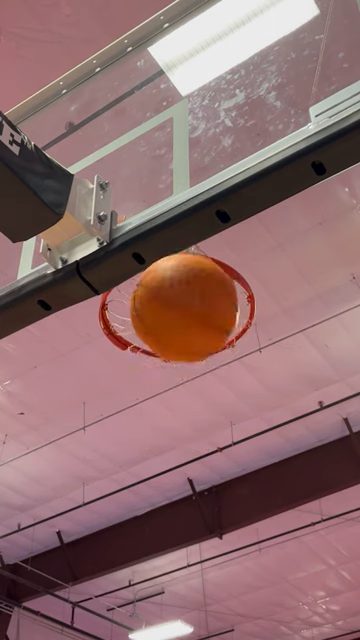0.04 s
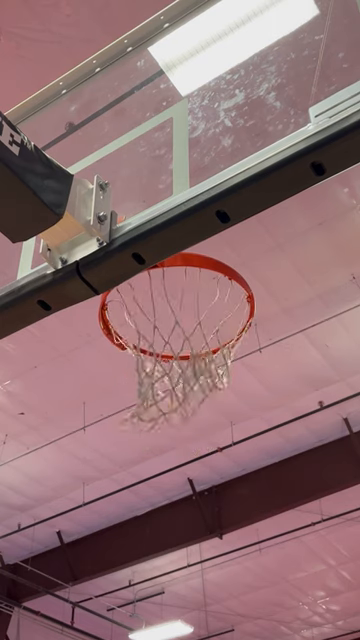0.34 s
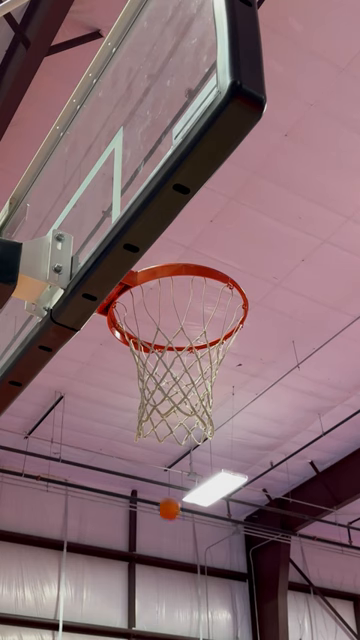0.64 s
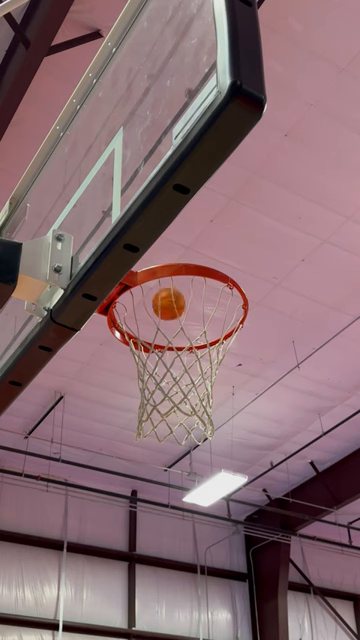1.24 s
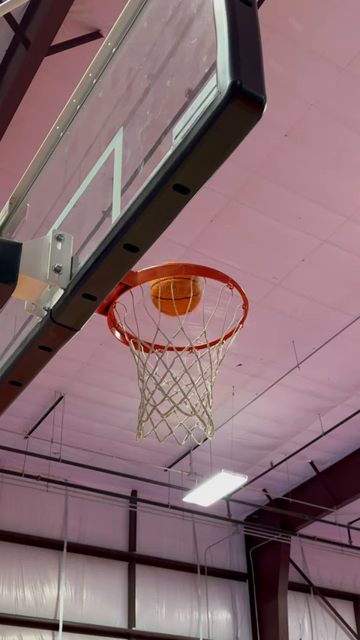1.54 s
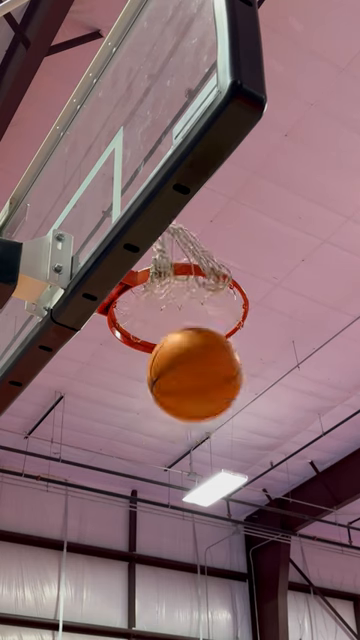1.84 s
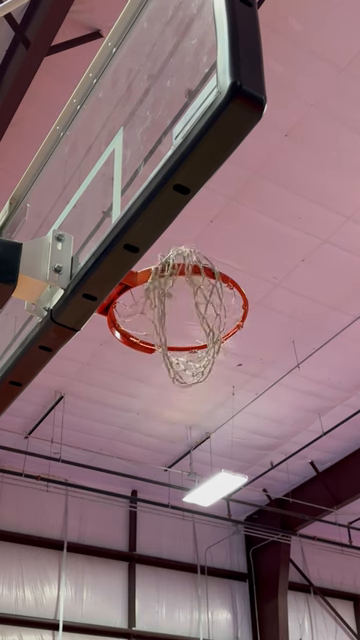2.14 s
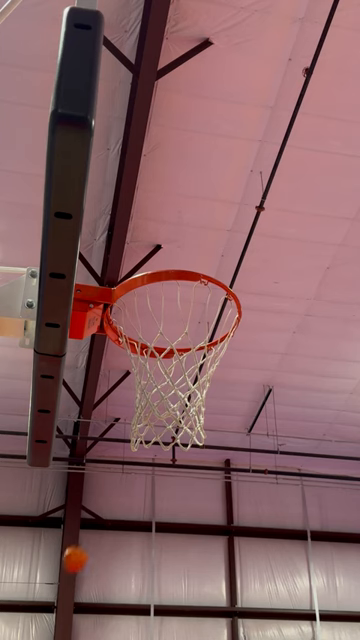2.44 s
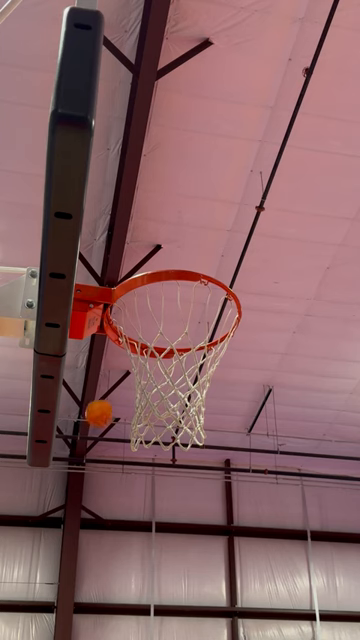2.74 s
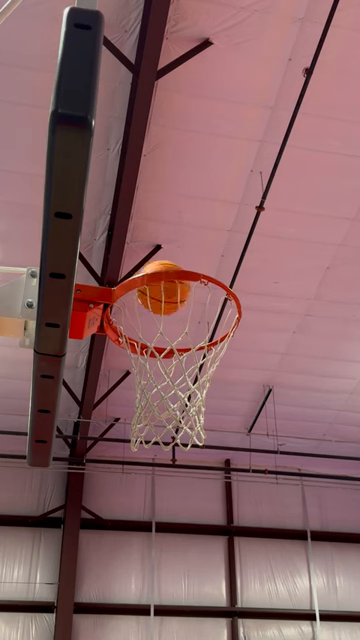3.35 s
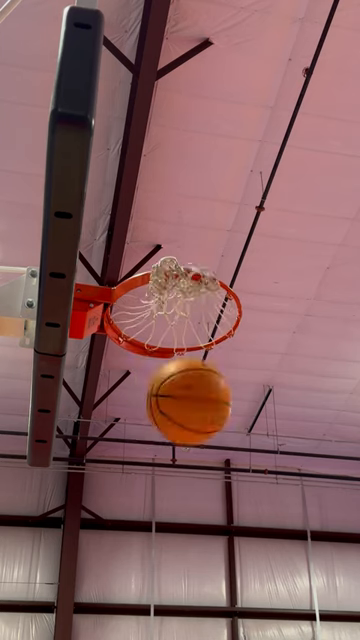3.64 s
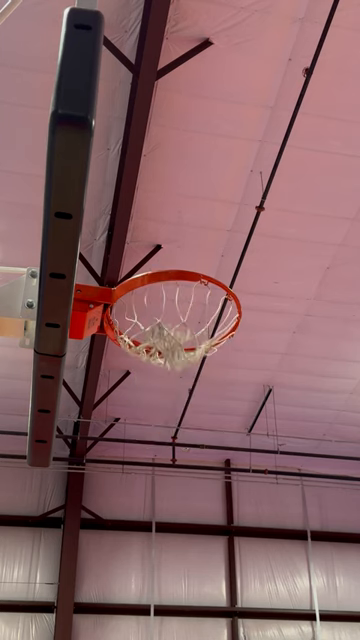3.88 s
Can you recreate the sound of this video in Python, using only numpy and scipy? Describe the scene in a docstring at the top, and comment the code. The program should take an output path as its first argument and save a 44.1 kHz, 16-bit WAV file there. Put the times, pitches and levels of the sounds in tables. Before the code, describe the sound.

Two sharp basketball net swishes close overhead, each after a dull thud on the gym floor.

```python
"""Swishes from under the hoop

Three basketball shots drop cleanly through a nylon net in a large gym, close above a stereo microphone.
The ball slaps the cords, rubs through them, and the net whips back; the first swish is already dying
away at the start. Duller thuds farther off (probably the shooter landing) come before the next two.
Shoes squeak faintly across the hall. Ventilation rumbles throughout, its level shifting with each shot."""
import sys
import numpy as np
from scipy import signal
from scipy.fft import rfft, irfft, next_fast_len
from scipy.io import wavfile
from scipy.ndimage import uniform_filter1d, map_coordinates

SR = 44100
rng = np.random.default_rng(int(sys.argv[2]) if len(sys.argv) > 2 else 0)


def store_wav(level_fs):
    """Save 16-bit WAV to argv[1]."""
    pcm = np.round(np.clip(np.atleast_2d(level_fs), -1, 1) * 32767)
    wavfile.write(sys.argv[1], SR, pcm.T.astype(np.int16))


N = 176400
LEAD_S = .3  # the first swish begins in this unheard lead-in
LEAD = round(LEAD_S * SR)
TOTAL = N + LEAD
TIME = np.arange(TOTAL) / SR - LEAD_S
SHOT_CHANGES = [.44, 2.256]  # seconds at which one shot cuts to the next

# Cords hitting the ball. Each row: start in seconds, thump, slap, crack and fizz in dB, decay in seconds.
CORD_SNAPS = [(-.15, -30, -17.5, -25.5, -25.5, 0.0026), (-.1, -19.5, -22.5, -21, -30, 0.0055),
              (1.7041, -31, -30, -33, -41.5, 0.0016), (1.7058, -25.5, -24.5, -37.5, -47.5, 0.0027),
              (1.7122, -29, -32, -35.5, -38, .0009), (1.7248, -41, -35, -41, -47, .002),
              (1.7285, -39, -27.5, -33.5, -40, .0018), (1.7312, -40, -32, -29.5, -27, 0.00086),
              (1.7376, -42, -36, -33.5, -43, 0.00052), (1.7478, -34.5, -33, -38.5, -48, .0012),
              (1.7783, -55.5, -56, -54, -55, .001), (1.7836, -55, -51.5, -57, -43.5, .0005),
              (1.794, -51, -48, -38.5, -55, 0.0055), (3.4926, -42.5, -29.5, -32, -36.5, 0.0013),
              (3.4967, -41.5, -28, -38, -42, 0.0011), (3.5015, -40.5, -28.5, -35.5, -47, .002),
              (3.5245, -31, -26.5, -34, -45, 0.006), (3.5315, -36.5, -24.5, -32.5, -39, 0.0011),
              (3.5330, -37, -16, -41, -49, 0.0002), (3.538, -40, -41.5, -36.5, -55, 0.00069),
              (3.553, -61, -37.5, -44, -43.5, 0.00092), (3.5562, -42.5, -38.5, -36.5, -42.5, 0.0015),
              (3.5632, -46, -47, -49, -48, 0.0015), (3.5712, -48, -44.5, -54, -53, 0.00037),
              (3.5795, -58, -50.5, -56, -54, 0.00032), (3.5964, -58, -32, -37, -54, .003),
              (3.6040, -48, -40, -39.5, -49, 0.00066), (3.616, -48, -38.5, -49, -55, 0.0049)]
# Resonances of ball and taut net. Each row: centre in Hz, width in Hz, gain in dB.
THUMP_MODES = [(545, 94, 4), (630, 110, -2.5), (920, 200, -6.5)]
SLAP_MODES = [(1093, 130, -8), (1280, 210, 5.5), (1604, 250, -5.5)]
SHOVE_MODES = [(180, 70, -1.5), (300, 38, 1)]
# Tone of the nylon, close up. Each row: frequency in Hz, gain in dB.
CRACK_TONE = [(300, -11.5), (1200, -1), (2000, 3), (2900, -7), (3800, 5), (4500, 0), (5100, 2.5),
              (6000, -12), (9000, -21.5), (16000, -40)]
FIZZ_TONE = [(2000, -27.5), (5000, -6), (6300, 1), (8300, -2), (9500, -4), (12800, -7), (16000, -18.5)]
RUB_TONE = [(100, -20.5), (350, -7.5), (500, 1.5), (850, 0), (1350, 0), (2000, -6), (2900, -7.5),
            (4200, -8.5), (5500, -8.5), (7500, -15.5), (13000, -25), (16000, -38)]
# The ball ringing on. Each row: pitch in Hz, level in dB, seconds to fall 60 dB.
BALL_MODES = [(502, 5, 0.18), (1230, 6, 0.64), (1356, -2.5, 0.55), (1510, 1, .8), (2130, -5, 0.7),
              (3710, -0.5, 0.65), (5080, -4, 0.55)]
# The ball bearing on the net. Each row: start in seconds, first and last pitch in Hz, level in dB,
# rise in seconds.
HOLLOW_NOTES = [(1.7045, 1200, 490, -21, .0065), (1.7255, 1163, 560, -29.5, 0.0045),
                (1.7425, 802, 474, -28.5, .0095), (3.494, 1285, 658, -35, 0.011),
                (3.519, 752, 650, -28.5, 0.0074), (3.534, 680, 473, -28.5, 0.0069),
                (3.555, 797, 564, -38, .006), (3.572, 545, 474, -38, 0.0078)]
# The net taking the weight. Each row: start in seconds, level in dB, decay in seconds.
NET_SHOVES = [(1.711, -34.5, 0.0037), (1.721, -37, .008), (3.4979, -33, 0.0025), (3.513, -46, 0.0059)]
RUB_STARTS_S = [1.705, 3.494]  # seconds at which the ball starts through the mesh
# The rub after each start. Each row: hold in seconds, level in dB, settling time in seconds.
MESH_RUBS = [(0.043, -36.5, .012), (0.044, -38.5, 0.086)]
CATCH_PER_S = 220  # how fast the mesh catches and lets go

# Blows on the floor. Each row: start in seconds, body in dB, scuff in dB, decay in seconds.
FLOOR_THUDS = [(0.6128, -32.5, -41.5, 0.003), (0.6241, -33, -39, 0.0022), (0.63, -36.5, -49, 0.0017),
               (.639, -30, -57, 0.0092), (.651, -34, -50.5, 0.016), (.697, -41.5, -57.5, 0.016),
               (2.5041, -36.5, -41, 0.0066), (2.514, -31.5, -46, 0.012), (2.534, -29, -41.5, 0.007),
               (2.544, -35, -53, 0.015)]
# The hardest landings. Each row: time in seconds, level in dB.
BOARD_PUSHES = [(0.6311, -24.5), (2.509, -25.5), (2.518, -26)]
# Tone of the floor. Each row: frequency in Hz, gain in dB.
BOARD_TONE = [(60, -13.5), (150, -2), (330, 4), (520, 1.5), (750, 3), (1300, -3), (2000, -11),
              (3000, -27.5), (6000, -48), (16000, -65)]
SCUFF_TONE = [(500, -15.5), (2200, 5), (3200, -1.5), (5000, -3.5), (7500, -2.5), (9200, -6.5),
              (12500, -13.5), (16000, -22)]
# Faint ticks, and a small click at the cut to the last shot.
# Each row: start in seconds, level in dB, decay in seconds.
FAINT_TICKS = [(1.056, -70.5, 0.024), (1.2498, -66.5, 0.00087), (1.256, -70.5, 0.0032), (1.502, -78, .0012),
               (1.522, -79.5, 0.0027), (2.257, -68.5, 0.008), (3.7367, -55.5, 0.0017)]
# A brushing hiss swelling as the first shot ends. Each row: time in seconds, level in dB.
BRUSH_SWELL = [(.2, -77), (.33, -73), (.395, -72), (.42, -51.5), (.438, -56.5), (.442, -110)]
# Tone of ticks and brushing. Each row: frequency in Hz, gain in dB.
TICK_TONE = [(1000, -14), (4000, 3), (7300, 5.5), (9500, 0.5), (12500, -12), (16000, -21)]
BRUSH_TONE = [(300, -6), (1500, -3), (2900, 0.5), (4500, 0.5), (7500, -5), (12800, -13.5), (16000, -17.5)]
# Shoes across the hall. Each row: start and length in seconds, pitch in Hz, level in dB.
FAR_SQUEAKS = [(0.526, 0.34, 4600, -73), (2.37, 0.35, 4640, -84), (3.718, 0.11, 4940, -56.5)]
# Ventilation, shot by shot. Each row: rumble, low hum, high hum and air in dB.
VENT_LEVELS = [(-44, -56.5, -48, -56), (-44.5, -50, -55, -57), (-39, -41, -46, -59)]
# Tone of the ventilation. Each row: frequency in Hz, gain in dB.
RUMBLE_TONE = [(20, -12), (35, -11.5), (48, 2.5), (68, 1.5), (82, -0.5), (98, -2.5), (140, -8.5),
               (200, -19), (300, -28.5), (600, -60.5), (3000, -118)]
AIR_TONE = [(100, -7.5), (250, 2.5), (400, -6.5), (800, -5.5), (1300, -16.5), (2000, -21.5), (3000, -34),
            (5000, -40), (6500, -44), (9500, -45), (12000, -57), (16000, -63.5)]

# Decay of the hall. Each row: frequency in Hz, seconds to fall 60 dB.
HALL_T60 = [(100, 1.1), (500, 1.1), (1300, 1.465), (4000, 1.057), (7500, 0.57), (13000, 0.46),
            (16000, 0.28)]
# Tone of the hall's tail. Each row: frequency in Hz, gain in dB.
HALL_TONE = [(100, -22.5), (500, -18), (1300, -17.5), (2500, -14.5), (4500, -11.5), (7500, -12.5),
             (13000, -18.5)]
# Diffuse sound at the microphone's two ports. Each row: frequency in Hz, left-right correlation.
PORT_LIKENESS = [(80, 1), (130, .998), (290, .9), (640, .45), (1400, .5), (3000, -.05), (15000, -.1)]
# Direct sound from net and floor. Each row: frequency in Hz, left over right in dB.
NET_BALANCE = [(100, 1), (300, 1), (600, 2.4), (1200, 0.5), (2400, -2.5), (4000, -0.5), (14000, 1.5)]
THUD_BALANCE = [(100, -2), (700, 3.5), (1300, 2.5), (2600, -5), (3900, -1.5), (5000, -5), (6000, 1.5),
                (14000, 1)]
# The same two paths. Each row: frequency in Hz, radians by which left leads.
NET_PHASE = [(0, 0), (500, -.58), (1400, -.25), (2500, 2.1), (3100, 2.1), (3900, 1.3), (4800, 1.4),
             (5600, 3.2), (7400, 6), (8000, 6.6), (12200, 12.2), (16000, 17.2)]
THUD_PHASE = [(0, 0), (1400, 0), (2500, 1.8), (3800, 1), (4400, 2.5), (5200, 2), (5600, 3.2), (7400, 6.1),
              (8000, 6.6), (12200, 12.2), (16000, 17.2)]
# Two narrow dips and a slight lift in the treble. Each row: centre in Hz, width in Hz, gain in dB.
TREBLE_NOTCHES = [(5564, 230, -6.5), (10070, 390, -10.5), (14920, 420, 1)]


def cord_snaps(ring_db=-34.5, waver_per_s=70, waver_rad=1.2):
    """Just overhead, each cord thumps, slaps, cracks and fizzes on the ball and leaves it ringing."""
    out, t = np.zeros(TOTAL), np.arange(SR // 2) / SR
    wavers = [waver_rad * wobble(waver_per_s, len(t)) for _ in BALL_MODES]
    tones = [resonances(THUMP_MODES), resonances(SLAP_MODES), colour(CRACK_TONE), colour(FIZZ_TONE)]
    for start, thump_db, slap_db, crack_db, fizz_db, decay_s in CORD_SNAPS:
        gains = amp([thump_db, slap_db, crack_db, fizz_db])
        add(out, start, sum(gain * burst(decay_s, tone) for gain, tone in zip(gains, tones)))
        for (hz, db, t60), waver in zip(BALL_MODES, wavers):
            ring = amp(db - 60 * t / t60) * np.sin(2 * np.pi * (hz * t + rng.random()) + waver)
            add(out, start, amp(slap_db + ring_db) * ring)
    return out


def ball_weight(sink_s=.006, roughness=.17):
    """The ball loads the net: low shoves, and hollow notes that sink in pitch as the cords give."""
    out, t = np.zeros(TOTAL), np.arange(SR // 8) / SR
    for start, first_hz, last_hz, db, rise_s in HOLLOW_NOTES:
        hz = last_hz + (first_hz - last_hz) * np.exp(-t / sink_s)
        swell = (t / rise_s * np.exp(1 - t / rise_s)) ** 2
        catching = 1 + roughness * wobble(CATCH_PER_S, len(t))
        note = np.sin(2 * np.pi * (np.cumsum(hz) / SR + rng.random()))
        add(out, start, amp(db) * swell * catching * note)
    for start, db, decay_s in NET_SHOVES:
        add(out, start, amp(db) * burst(decay_s, resonances(SHOVE_MODES)))
    return out


def mesh_rub(slips_per_s=2200, catch_db=-1.5):
    """Dense slips of nylon on the pebbled ball, dying away as the net settles."""
    level = np.zeros(TOTAL)
    for start, (hold_s, db, settle_s) in zip(RUB_STARTS_S, MESH_RUBS):
        since_hold = np.maximum(TIME - start - hold_s, 0)
        level += amp(db) * (TIME > start) * np.exp(-since_hold / settle_s)
    slips = rng.standard_normal(TOTAL) * (rng.random(TOTAL) < slips_per_s / SR)
    catching = amp(catch_db * wobble(CATCH_PER_S, TOTAL))
    return level * unit(filtered(slips * catching, colour(RUB_TONE)))


def floor_thuds(push_s=.00045):
    """Farther off, dull blows with a bright scuff on the wooden floor; the hardest push the boards."""
    out = np.zeros(TOTAL)
    for start, body_db, scuff_db, decay_s in FLOOR_THUDS:
        add(out, start, amp(body_db) * burst(decay_s, colour(BOARD_TONE)))
        add(out, start, amp(scuff_db) * burst(decay_s, colour(SCUFF_TONE)))
    for centre, db in BOARD_PUSHES:
        offset = (TIME - centre) / push_s
        out -= amp(db) * offset * np.exp((1 - offset ** 2) / 2)  # one swing up and down
    return out


def brush_and_ticks():
    """One brushing swell, faint ticks, and a small click at the cut to the last shot."""
    swell = amp(np.interp(TIME, *np.transpose(BRUSH_SWELL), left=-120))
    out = swell * unit(filtered(rng.standard_normal(TOTAL), colour(BRUSH_TONE)))
    for start, db, decay_s in FAINT_TICKS:
        add(out, start, amp(db) * burst(decay_s, colour(TICK_TONE)))
    return out


def shoe_squeaks(width_hz=300, flutter_per_s=50, flutter_db=6.5):
    """Distant shoe squeaks, blurred by the hall into fluttering bands of noise."""
    out = np.zeros((2, TOTAL))
    flutter = amp(flutter_db * wobble(flutter_per_s, TOTAL))
    for start, length_s, hz, db in FAR_SQUEAKS:
        swell = np.exp(-(2 * (TIME - start) / length_s - 1) ** 2)
        out += amp(db) * swell * wash(lambda f: np.exp(-((f - hz) / width_hz) ** 2))
    return flutter * out


def ventilation(hums_hz=(73.17, 123.76), width_hz=2.7, crossfade_s=.02):
    """Room tone from all around: rumble, two wavering hums and moving air, at each shot's levels."""
    steps = amp(VENT_LEVELS)[np.searchsorted(SHOT_CHANGES, TIME)].T
    gains = uniform_filter1d(steps, round(crossfade_s * SR), axis=1)
    hums = [wash(lambda f: 1 / (1 + ((f - hz) / width_hz) ** 2)) for hz in hums_hz]
    layers = [wash(colour(RUMBLE_TONE)), *hums, wash(colour(AIR_TONE))]
    return sum(gain * layer for gain, layer in zip(gains, layers))


def gym_reverb(x, early_db=-18, early_t60_s=.22, build_s=.0019):
    """The gym answers with early reflections and a long tail, which ends with its shot."""
    out, shot = np.zeros((2, TOTAL)), np.searchsorted(SHOT_CHANGES, TIME)
    for k in range(len(SHOT_CHANGES) + 1):
        hz, frame_s, spectrum = signal.stft(rng.standard_normal((2, 2 * SR)), SR, nperseg=256)
        decay = amp(-60 * frame_s / along(HALL_T60, hz)[:, None])
        tail = signal.istft(spectrum * decay, SR, nperseg=256)[1]
        t = np.arange(tail.shape[1]) / SR
        build = 1 - np.exp(-t / build_s)
        tail *= build
        early = rng.standard_normal(tail.shape) * amp(-60 * t / early_t60_s) * build
        answer = filtered(tail / np.linalg.norm(tail[0]), colour(HALL_TONE))
        answer += amp(early_db) * early / np.linalg.norm(early[0])
        gate = shot == k
        out += gate * signal.fftconvolve((x * gate)[None], diffuse(answer), axes=1)[:, :TOTAL]
    return out


def at_ports(x, balance, phase):
    """Direct sound reaches the two ports with the level and phase differences of its direction."""
    half = np.array([[1], [-1]]) / 2
    def response(hz):
        lead_rad = np.interp(hz, *np.transpose(phase))
        return amp(half * along(balance, hz)) * np.exp(1j * half * lead_rad)
    return filtered(x, response)


def diffuse(pair):
    """Two unrelated signals become one diffuse field at the two ports."""
    angle = lambda hz: np.arccos(np.clip(along(PORT_LIKENESS, hz), -1, 1)) / 2
    mid, side = filtered(pair, lambda hz: np.array([np.cos(angle(hz)), np.sin(angle(hz))]))
    return np.array([mid + side, mid - side])


def wash(response):
    """Steady diffuse noise of rms 1."""
    return unit(diffuse(filtered(rng.standard_normal((2, TOTAL)), response)))


def burst(decay_s, response, energy_s=.005):
    """A rough contact ringing through a response, with the energy of energy_s seconds at rms 1."""
    t = np.arange(SR // 6) / SR
    envelope = t * np.exp(-2 * t / decay_s)
    contact = filtered(rng.standard_normal(len(t)) * envelope, response)
    return contact * np.sqrt(energy_s * SR / np.sum(contact ** 2))


def resonances(modes):
    """Causal response of a few broad resonances of alternating sign."""
    return lambda f: sum((-1) ** k * amp(db) * 1j * f * width / (hz * hz - f * f + 1j * f * width)
                         for k, (hz, width, db) in enumerate(modes))


def colour(points):
    """Minimum-phase response with the gain of the (Hz, dB) points."""
    def response(hz):
        cepstrum = irfft(np.log(amp(along(points, hz))))
        middle = len(cepstrum) // 2
        cepstrum[1:middle] *= 2
        cepstrum[middle + 1:] = 0
        return np.exp(rfft(cepstrum))
    return response


def filtered(x, response):
    """Pass x through a response of frequency."""
    n = x.shape[-1]
    padded = 2 * next_fast_len(n // 2 + 4096)
    hz = np.fft.rfftfreq(padded, 1 / SR)
    return irfft(rfft(x, padded) * response(hz), padded)[..., :n]


def along(points, hz):
    """(Hz, value) points read on a log axis."""
    knots_hz, values = np.transpose(points)
    return np.interp(np.log(hz + 1), np.log(knots_hz + 1), values)


def wobble(rate, n):
    """A smooth random curve of n samples, rate knots a second."""
    return map_coordinates(rng.standard_normal(4096), [np.arange(n) * rate / SR], mode="mirror")


def add(track, start_s, x):
    """Mix x into the track at start_s."""
    i = max(round(start_s * SR) + LEAD, 0)
    track[i:i + len(x)] += x[:TOTAL - i]


def amp(db):
    """Decibels to gain."""
    return 10 ** (np.asarray(db) / 20)


def unit(x):
    """Scale to rms 1."""
    return x / np.sqrt(np.mean(x ** 2) + 1e-20)


def scene(far_send_db=7.5):
    """From under the hoop: the net is close, the floor farther off with more of the hall on it."""
    near = cord_snaps() + ball_weight() + mesh_rub() + brush_and_ticks()
    far = floor_thuds()
    direct = at_ports(near, NET_BALANCE, NET_PHASE) + at_ports(far, THUD_BALANCE, THUD_PHASE)
    hall = gym_reverb(near + amp(far_send_db) * far)
    return (direct + hall + shoe_squeaks() + ventilation())[:, LEAD:]


def record(dry):
    """The sound has narrow dips in the treble and a steep band limit."""
    top_hz, steepness = 15900, 120
    dips = lambda f: amp(sum(db * np.exp(-((f - hz) / width) ** 2) for hz, width, db in TREBLE_NOTCHES))
    return filtered(dry, lambda f: dips(f) / (1 + (f / top_hz) ** steepness))


dry = scene()
out = record(dry)
store_wav(out)
```